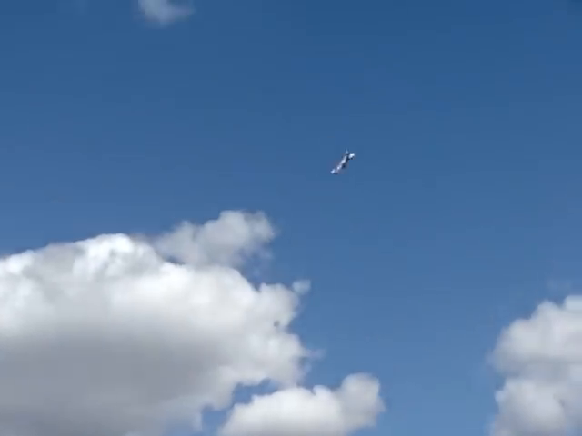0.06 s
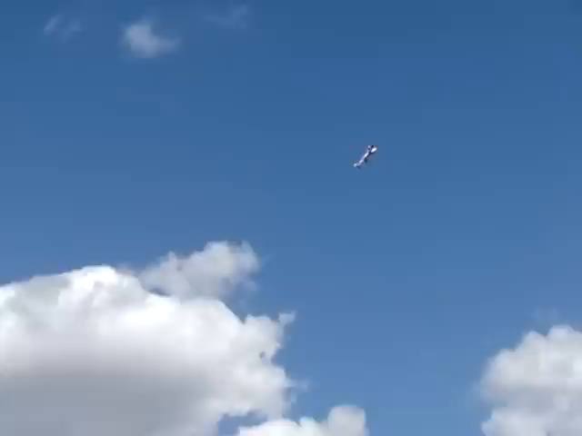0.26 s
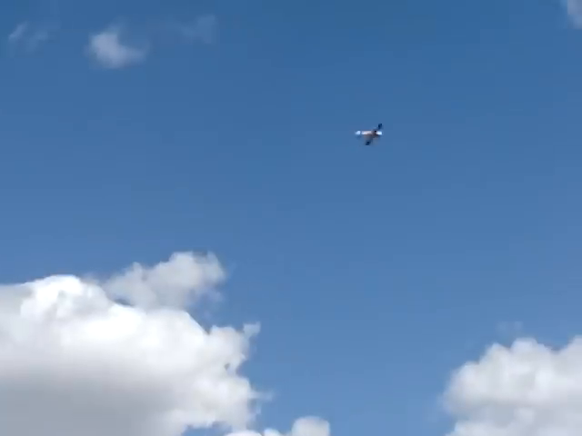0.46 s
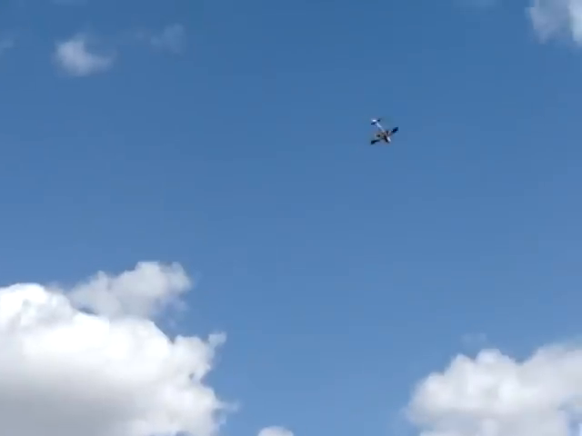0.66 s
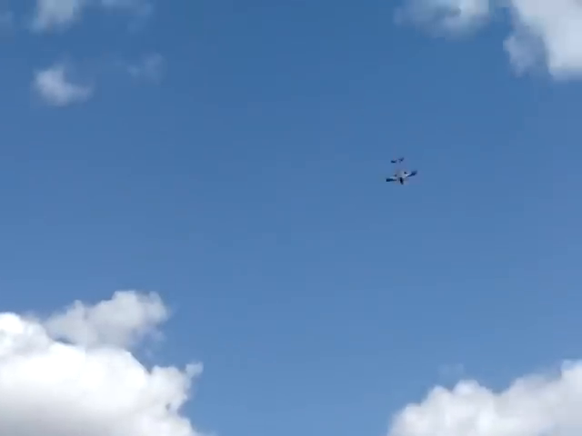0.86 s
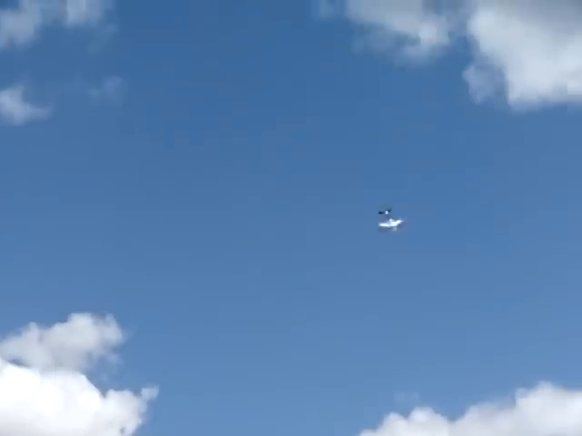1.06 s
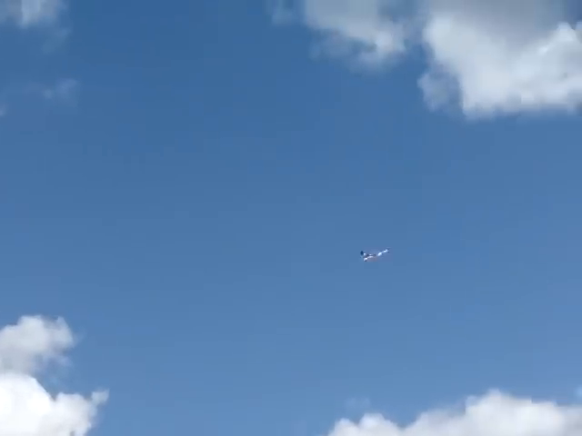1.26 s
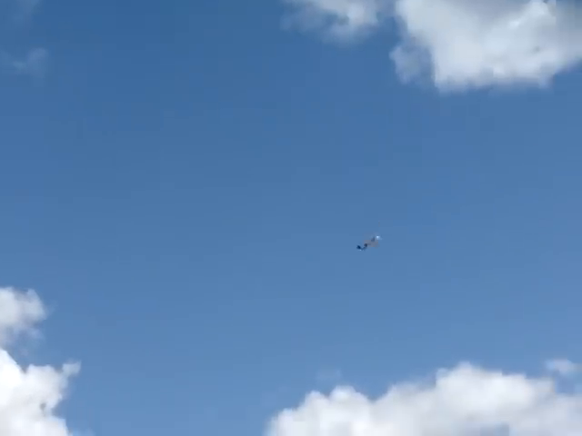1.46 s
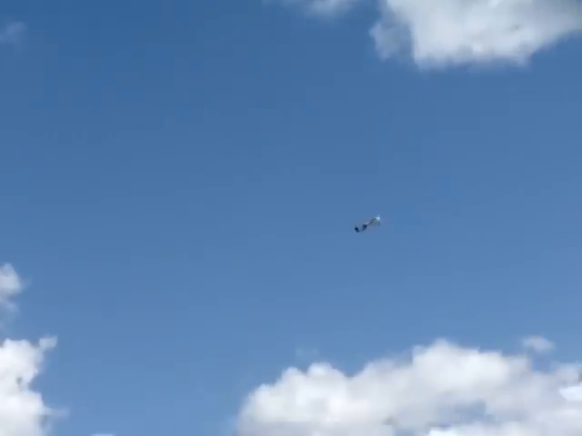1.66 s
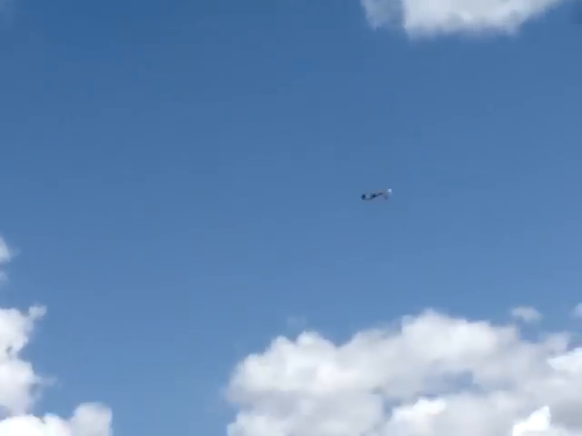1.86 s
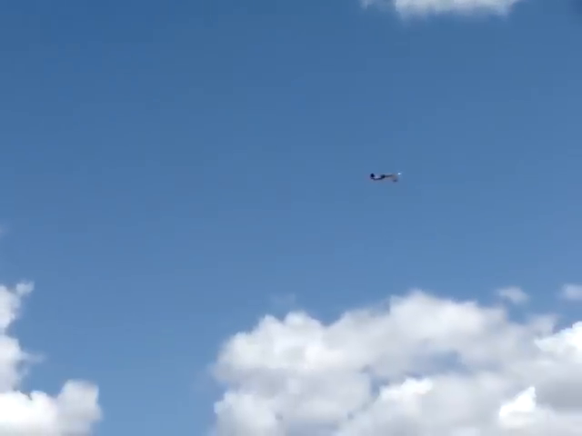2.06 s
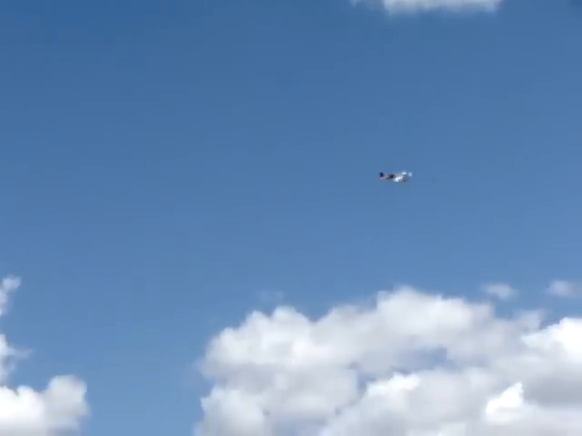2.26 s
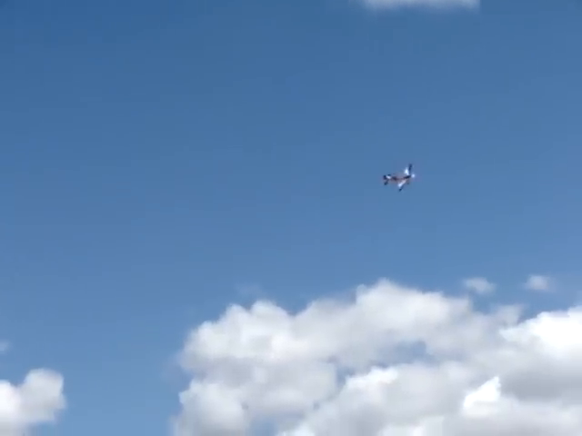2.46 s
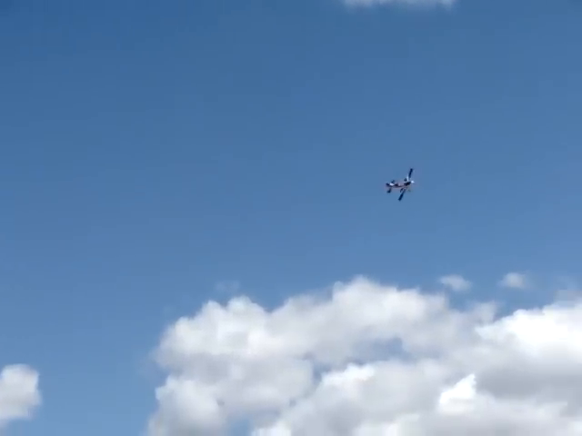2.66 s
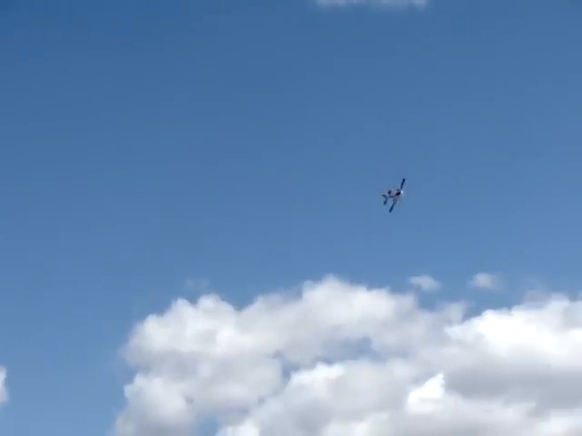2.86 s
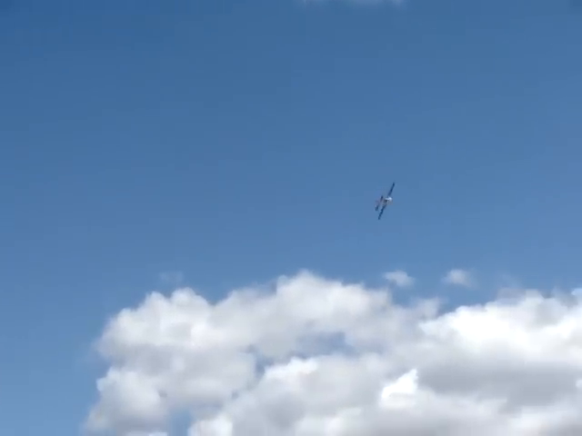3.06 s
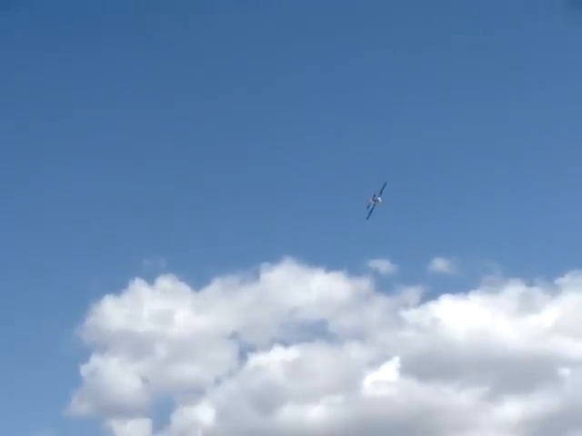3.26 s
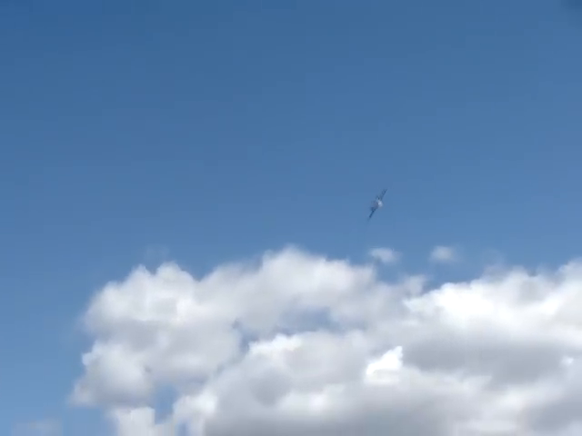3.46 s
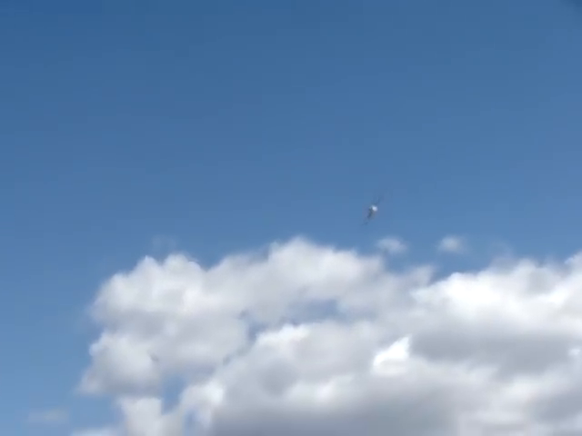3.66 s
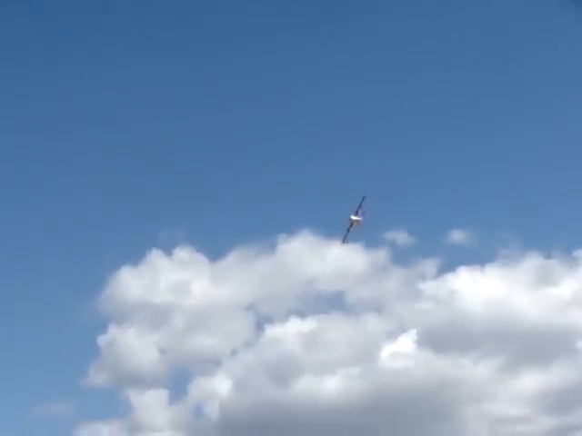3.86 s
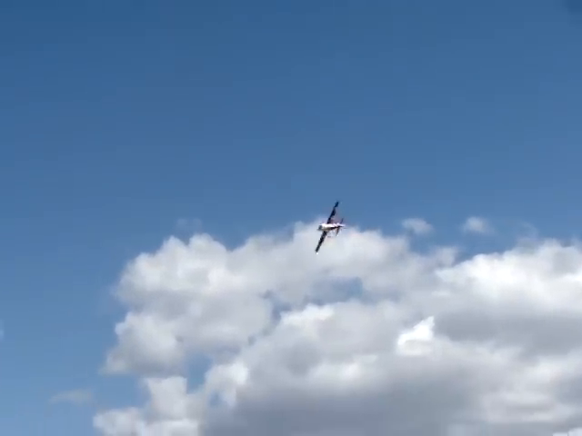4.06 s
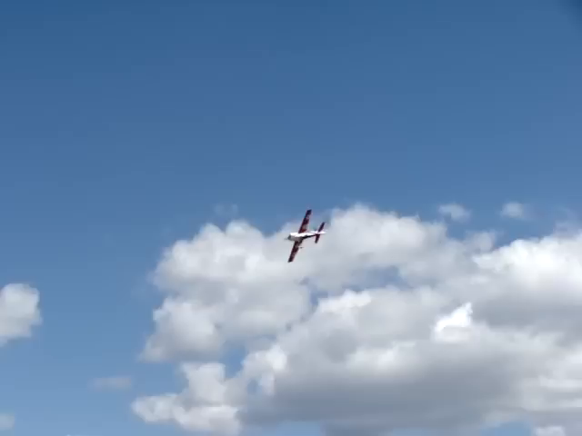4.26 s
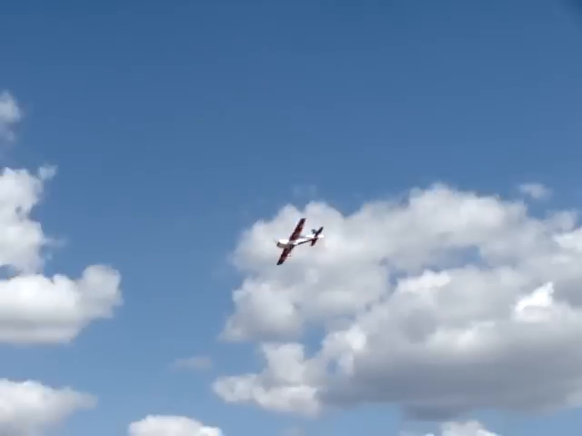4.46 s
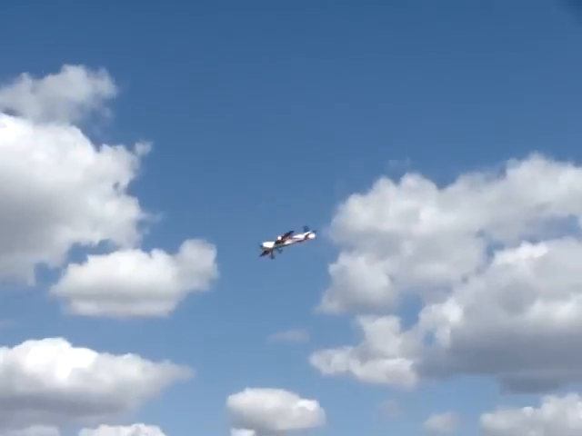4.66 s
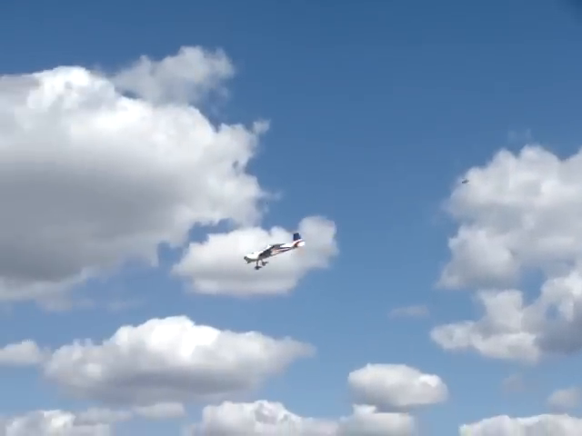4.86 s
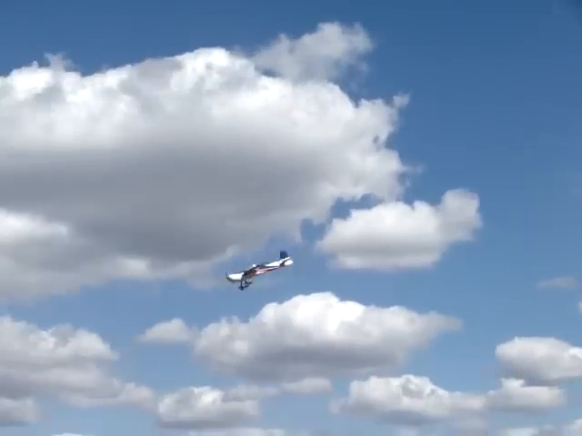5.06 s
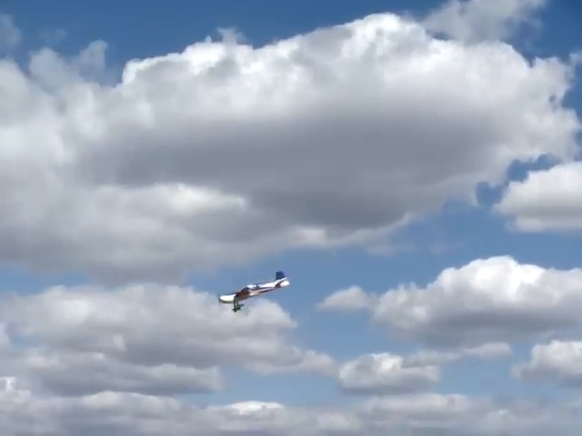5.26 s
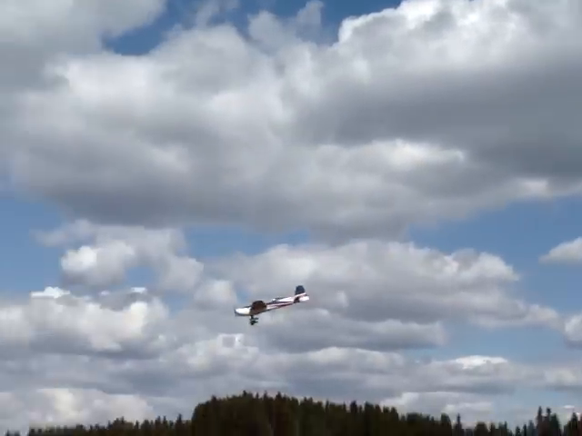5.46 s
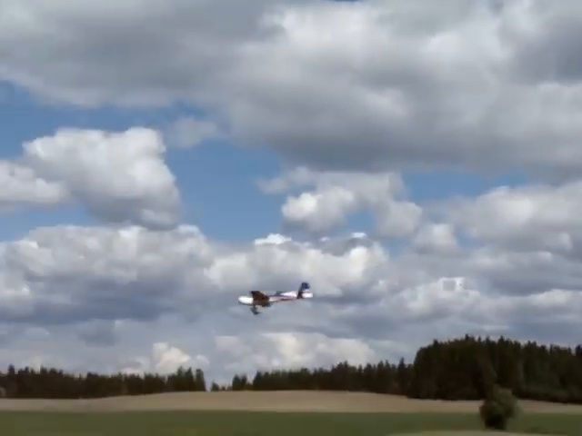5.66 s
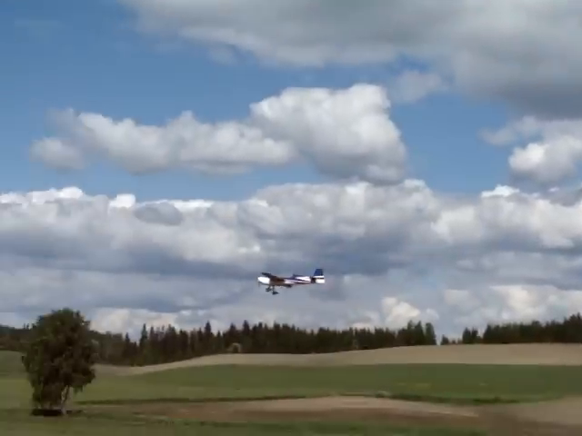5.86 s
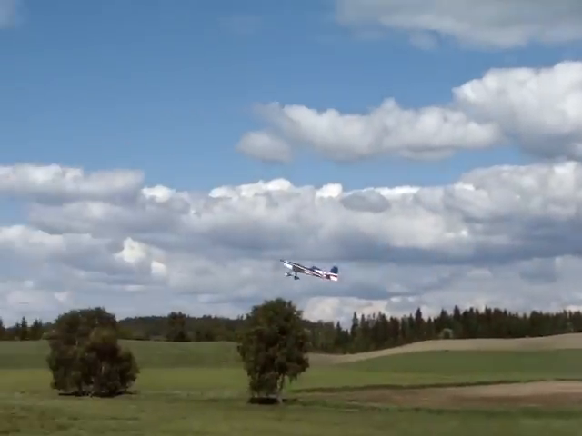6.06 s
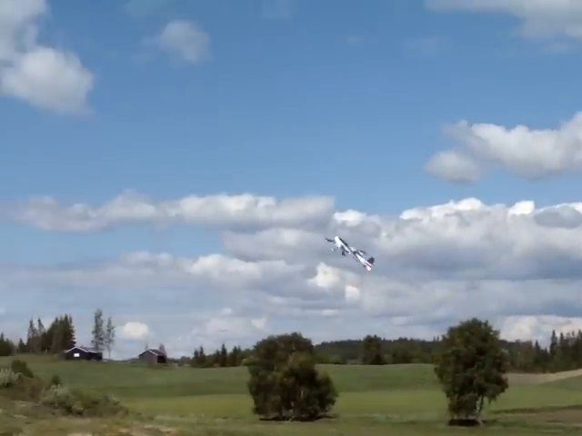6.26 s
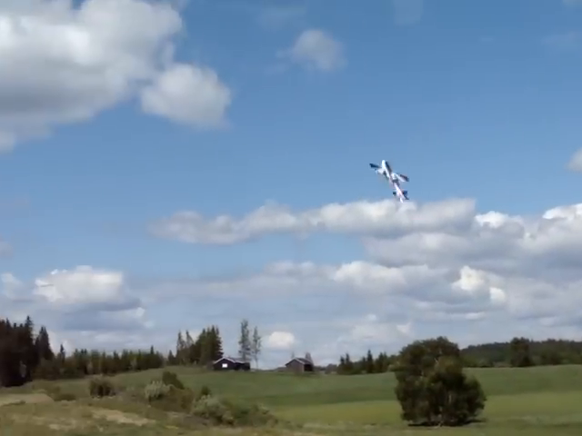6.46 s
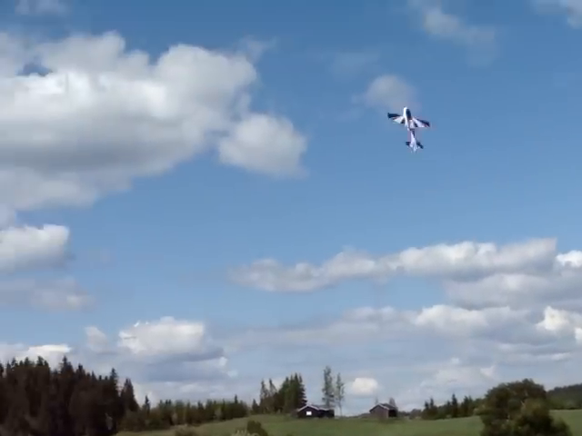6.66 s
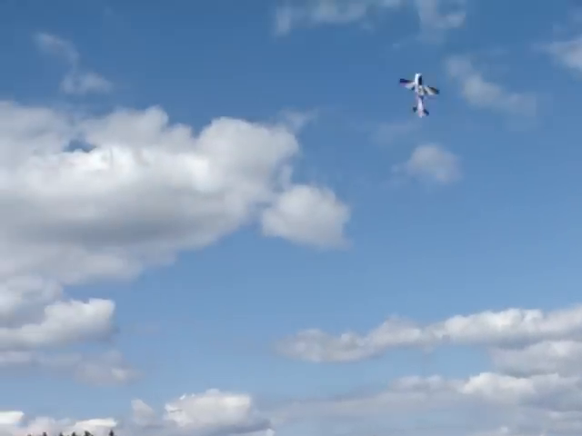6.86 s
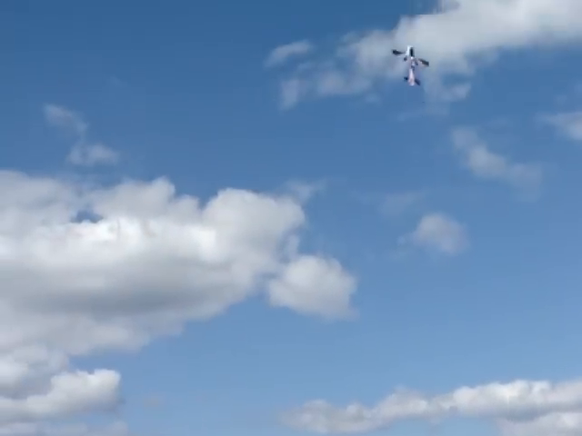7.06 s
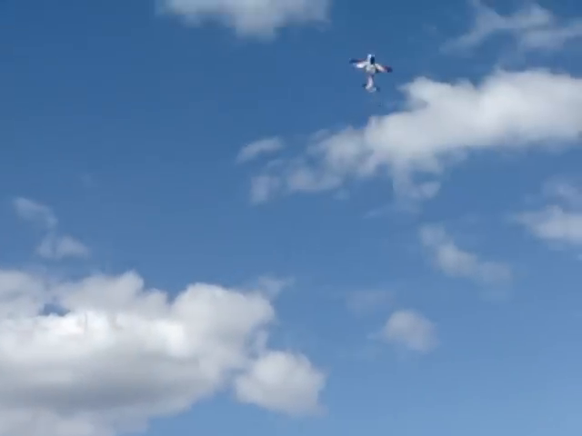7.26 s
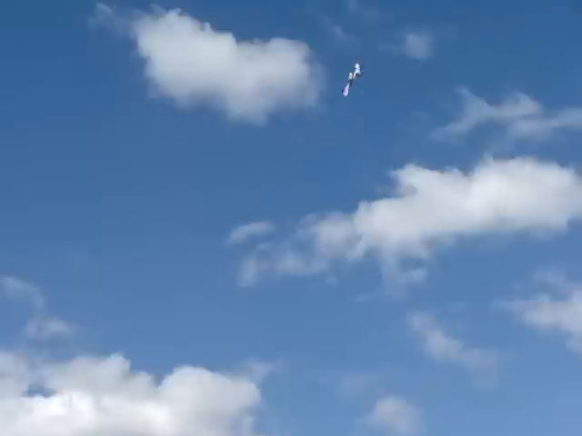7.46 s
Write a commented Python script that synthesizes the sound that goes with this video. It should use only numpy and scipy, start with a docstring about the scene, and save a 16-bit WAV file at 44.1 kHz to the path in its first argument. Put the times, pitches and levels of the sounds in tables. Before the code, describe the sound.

Outdoor two-stroke model plane drones loudly, throttles back under buffeting microphone wind, then howls up to full power for a raspy low pass and climb.

```python
"""A buzzing two-stroke petrol engine climbs at full power, sinks to a sputtering idle, surges and roars by again.
It drives a large model aeroplane over a field: it throttles back, turns towards the listener, makes a low pass
and pulls up. Pulses locked to the crankshaft make the exhaust note, and noise bursts make the rasp and sputter.
A delayed copy from the grass adds a gliding hollow tone. Shaped noise makes the breeze, the gusts that buffet
the microphone, the crackling blasts while the engine idles, and the faint hiss of open air."""
import sys
import numpy as np
from scipy import signal
from scipy.fft import rfft, irfft, next_fast_len
from scipy.io import wavfile
from scipy.ndimage import uniform_filter1d, map_coordinates

SR = 44100
rng = np.random.default_rng(int(sys.argv[2]) if len(sys.argv) > 2 else 0)


def generate_wav(sig):
    """Save sig (samples, or channels by samples) to the path in sys.argv[1] as 16-bit PCM at SR."""
    pcm = np.round(np.clip(np.atleast_2d(sig).T, -1, 1) * 32767).astype(np.int16)
    wavfile.write(sys.argv[1], SR, pcm)


N = 331191  # length of the scene in samples

# How late the echo off the grass arrives, later when the aeroplane is high: (time [s], lag [ms])
ECHO_LAG = [(0, 3.39), (1.05, 3.97), (1.5, 3.64), (3.3, 2.97), (4.8, 2.542), (5.5, 2.21), (5.9, 1.636),
            (6.15, 1.57), (6.5, 1.85), (6.8, 2.47), (7.51, 3.78)]
# Crankshaft speed at full power and at idle (turns a second)
FULL_SPEED, IDLE_SPEED = 103.5, 45


def amp(db):
    """Turn decibels into a gain."""
    return 10 ** (np.asarray(db) / 20)


def unit(x):
    """Scale to an average strength (rms) of 1."""
    return x / np.sqrt(np.mean(x ** 2) + 1e-20)


def curve(*tables, axis=1):
    """Join tables that follow each other in time and read one column as a value per sample."""
    rows = np.vstack(tables)
    return np.interp(np.arange(N) / SR, rows[:, 0], rows[:, axis])


def passing(rows):
    """Gain of a (time [s], level [dB]) table that fades almost to silence outside its span."""
    before = [(rows[0][0] - .1, -90)]
    after = [(rows[-1][0] + .1, -90)]
    return amp(curve(before, rows, after))


def swells(rows, rise_db_per_s, fall_db_per_s):
    """Gain of (start [s], held [s], level [dB]) events that rise, hold and die away; the loudest one counts."""
    t = np.arange(N) / SR
    shapes = []
    for start, held, db in rows:
        rise = rise_db_per_s * np.maximum(start - t, 0)
        fall = fall_db_per_s * np.maximum(t - start - held, 0)
        shapes.append(db - rise - fall)
    return amp(np.max(shapes, axis=0))


def wobble(rate):
    """A smooth random curve through this many random points a second."""
    points = rng.standard_normal(int(N * rate / SR) + 4)
    return map_coordinates(points, [np.arange(N) * rate / SR])


def noise():
    """White noise: an even hiss."""
    return rng.standard_normal(N)


def colour(x, points):
    """Filter x to the given (frequency [Hz], level [dB]) shape, with no sound ahead of its cause."""
    size = 8192
    hz, db = np.transpose(points)
    shape = np.interp(np.log(np.fft.rfftfreq(size, 1 / SR) + 1), np.log(hz + 1), db)
    # folding the cepstrum (spectrum of the log spectrum) puts all the ringing after the start
    cepstrum = irfft(np.log(amp(shape)))
    cepstrum[1:size // 2] *= 2
    cepstrum[size // 2 + 1:] = 0
    ringing = irfft(np.exp(rfft(cepstrum)))[:size // 2]
    return signal.fftconvolve(x, ringing)[:N]


def lowpass(x, hz):
    """Gently take away the treble above hz."""
    return signal.sosfilt(signal.butter(2, hz, fs=SR, output="sos"), x)


def dull(x, hz, back_hz):
    """Take away treble forwards, then backwards, so that the sound is hardly shifted in time."""
    return lowpass(lowpass(x, hz)[::-1], back_hz)[::-1]


def resonate(x, modes):
    """Ring x through resonances: (centre [Hz], width [Hz], level [dB])."""
    return sum(amp(db) * signal.lfilter(*signal.iirpeak(hz, hz / width, SR), x) for hz, width, db in modes)


def disperse(x, hz, radius):
    """Delay frequencies near hz, which spreads each pulse in time without colouring it."""
    poles = [1, -2 * radius * np.cos(2 * np.pi * hz / SR), radius * radius]
    return signal.lfilter(poles[::-1], poles, x)


def steady(x):
    """Even out the level of x so that its midrange stays near rms 1."""
    mid = signal.sosfilt(signal.butter(2, [400, 2200], "band", fs=SR, output="sos"), x)
    power = uniform_filter1d(uniform_filter1d(mid ** 2, SR // 12), SR // 12)
    return x / np.sqrt(np.abs(power) + 1e-12)


def firings(turns, rough, jitter_s, ragged_s, scatter_db, misfire_db):
    """One impulse a turn, as a two-stroke fires; ragged running scatters their times and sizes."""
    at = np.interp(np.arange(1, int(turns[-1])), turns, np.arange(N))
    ragged = rough[at.astype(int)]
    chance = rng.standard_normal((len(at), 2))
    at = at + SR * (jitter_s + ragged_s * ragged ** 2) * chance[:, 0]
    strength = amp((scatter_db + misfire_db * ragged) * chance[:, 1])
    # a short windowed sinc places each impulse between samples
    taps = at.astype(int)[:, None] + np.arange(-7, 9)
    offset = taps - at[:, None]
    shape = np.sinc(offset) * np.cos(np.pi * offset / 16) ** 2
    return np.bincount(taps.clip(0, N - 1).ravel(), (strength[:, None] * shape).ravel(), N)


def puffs(turns, decay_turns, second_blade, between):
    """Noise that bursts at each firing and again as the second blade passes, half a turn on."""
    def burst(phase):
        return np.exp(-(phase % 1) / decay_turns)
    return noise() * (between + burst(turns) + second_blade * burst(turns + .5))


def engine():
    """Exhaust, rasp, throttle surge, propeller rip and low drone all follow the turning crankshaft."""
    # crankshaft speed, before its small random wander: (time [s], speed [turns a second])
    climb_speed = [(0, 103.5), (.67, 103.6), (.86, 95.4), (.94, 94.4), (1.02, 95.5), (1.19, 100.1),
                   (1.33, 102.2), (1.49, 102), (1.58, 96.6)]
    idle_speed = [(1.66, 84.5), (1.8, 69.7), (2.1, 55.1), (2.6, 46.1), (3.2, 43.87), (4.1, 44.47),
                  (4.61, 46.14), (4.76, 69.3)]
    pass_speed = [(4.82, 78.9), (4.94, 93.7), (5.1, 103.4), (5.21, 106.6), (5.48, 107.6), (5.82, 106.9),
                  (6.58, 102.8), (7.22, 102.9), (7.51, 101.8)]
    # exhaust level from where the aeroplane is, as if at full speed: (time [s], level [dB])
    reach = [(0, -19.5), (.66, -23), (1.13, -28.5), (1.42, -24.5), (1.9, -39.5), (2.6, -47.5), (3.6, -26),
             (4.6, -19), (5.4, -18.5), (5.85, -22.5), (6.3, -19.5), (6.62, -22.5), (7.05, -17.5),
             (7.51, -21)]
    # level of the rasp of propeller and exhaust jet, before its flutter: (time [s], level [dB])
    rasp_level = [(0, -40.5), (.35, -31.5), (.8, -48.5), (1.32, -37.5), (1.8, -43.5), (2.05, -70),
                  (2.85, -55), (3.42, -32.5), (3.76, -40), (3.98, -34), (4.36, -34), (4.9, -27.5),
                  (5.3, -30.5), (5.72, -24), (6.27, -29), (6.5, -35), (7.3, -31.5), (7.51, -40.5)]
    exhaust_db_per_octave = 8.5  # a slower engine is quieter

    speed = curve(climb_speed, idle_speed, pass_speed)
    rough = raggedness(speed)
    # a ragged engine cannot hold its speed
    speed = speed * (1 + (.0003 + .014 * rough) * wobble(25))
    turns = np.cumsum(speed) / SR
    view = sides_in_view()
    pulses = firings(turns, rough, jitter_s=.000013, ragged_s=.0003, scatter_db=.6, misfire_db=3)
    exhaust_db = curve(reach) + exhaust_db_per_octave * np.log2(speed / FULL_SPEED)
    main = amp(exhaust_db) * exhaust(turns, pulses, rough, view)
    edge = amp(curve(rasp_level)) * rasp(turns, rough, view)
    return main + edge + surge(turns, pulses) + rip(turns) + drone(speed, turns)


def raggedness(speed):
    """Uneven firing (0-1): least at steady full speed, more when slow or picking up."""
    at_full, at_idle, at_pickup = .03, .77, .25  # the last two are added to the first
    hardest_pickup = 130  # turns a second, gained each second
    gain_rate = uniform_filter1d(np.gradient(speed) * SR, size=SR // 8)
    pickup = np.clip(gain_rate / hardest_pickup, 0, 1)
    slack = np.clip((FULL_SPEED - speed) / (FULL_SPEED - IDLE_SPEED), 0, 1)
    rough = at_full + at_idle * slack ** .8 + at_pickup * pickup
    return np.minimum(rough, at_full + at_idle)


def sides_in_view():
    """Shares of tail, nose, flank, back and belly facing the listener, from the aeroplane's angles."""
    # (time [s], heading [degrees, nose-on 0 to tail-on 180], roll [degrees, belly -90 to back 90])
    attitude = [(0, 160, -86.5), (.72, 160, -64.5), (1, 97, -60.5), (1.6, 85, -84), (3.3, 55.5, -54),
                (4.9, 26.7, 40.5), (5.5, 3.03, 1), (5.9, 63.6, 31), (6.25, 120, 13), (6.62, 125, -60.5),
                (6.92, 91, 77.5), (7.51, 90.4, 74)]
    tail_spill, nose_spill = .051, .055  # shares heard from every side
    aspect = np.radians(curve(attitude))
    roll = np.radians(curve(attitude, axis=2))
    ahead, abeam = np.cos(aspect), np.abs(np.sin(aspect))
    upright, tilted = abeam * np.cos(roll), abeam * np.sin(roll)
    tail, nose, flank, back, belly = np.maximum([-ahead, ahead, upright, tilted, -tilted], 0)
    return tail + tail_spill, nose + nose_spill, flank, back, belly


def exhaust(turns, pulses, rough, view):
    """Firing pulses take the colour of the side in view and give way to noisy sputter at idle."""
    # colour of the firing heard from each side: (frequency [Hz], relative level [dB])
    from_tail = [(40, -55.5), (104, -8.5), (208, 6.5), (312, -5.5), (416, -6), (520, 1.5), (624, -5),
                 (728, -32.5), (832, -9), (936, 2.5), (1040, 2), (1144, 8), (1248, -4.5), (1352, -3),
                 (1664, 0.5), (2080, -14.5), (2496, -6), (3328, -21.5), (4576, -26), (6448, -53),
                 (9152, -103)]
    from_nose = [(40, -34), (104, -11), (208, -7), (312, -10), (416, 7.5), (520, -11.5), (624, -4),
                 (728, 4), (832, -1), (936, -9.5), (1040, -13.5), (1144, -15), (1248, 5.5), (1352, -14.5),
                 (1664, -11.5), (2080, -10), (2496, -10), (3328, -36), (4576, -32), (6448, -37),
                 (9152, -67.5)]
    from_flank = [(40, -41), (104, -14), (208, -4.5), (312, -6), (416, 2.5), (520, -17), (624, 4), (728, 8),
                  (832, -10), (936, -1.5), (1040, -11.5), (1144, 4), (1248, -8.5), (1352, 4.5),
                  (1570, -28.5), (1770, 1.5), (1900, -14.5), (2120, -10), (2496, -20.5), (3328, -26.5),
                  (4576, -15.5), (6448, -37.5), (9152, -38)]
    from_back = [(40, -50.5), (104, -27.5), (208, -3.5), (312, -27.5), (416, -40.5), (520, -10),
                 (624, -43.5), (728, -37), (832, -12.5), (936, -11.5), (1040, -15), (1144, -0.5),
                 (1248, -20.5), (1352, -9), (1750, -14), (2080, -21), (2496, -28), (3328, -28), (4576, -41),
                 (6448, -80), (9152, -74.5)]
    from_belly = [(40, -64.5), (104, -27), (208, 6), (312, -2.5), (416, -10), (520, 10), (624, 10.5),
                  (728, -3.5), (832, 8.5), (936, -3.5), (1040, 4), (1144, 5), (1248, -13), (1352, 6.5),
                  (1664, -18), (2080, 0.5), (3328, -33.5), (4576, -45.5), (9152, -63.5)]
    # colour of the sputter noise: (frequency [Hz], relative level [dB per Hz])
    sputter_colour = [(53, -42), (90, -20.5), (171, 0), (245, -3.5), (325, -0.5), (452, -20.5), (502, -6),
                      (570, 0.5), (729, -1.5), (968, -1.5), (1140, -1), (1390, -6), (1790, -8),
                      (2410, -5.5), (3200, -11), (4160, -82), (7040, -120)]

    sides = (from_tail, from_nose, from_flank, from_back, from_belly)
    note = sum(share * unit(colour(pulses, side)) for share, side in zip(view, sides))
    # the silencer spreads each pulse
    note = disperse(note, hz=540, radius=.94)
    sputter = colour(puffs(turns, decay_turns=.38, second_blade=1.0, between=.93), sputter_colour)
    mix = np.sqrt(1 - rough) * steady(note) + np.sqrt(rough) * steady(sputter)
    return mix * amp(.93 * wobble(14))


def rasp(turns, rough, view):
    """Jet noise in bursts, with sharp cracks at each firing and half a turn on, strongest from front and side."""
    # colour of the rasp: (frequency [Hz], relative level [dB per Hz])
    rasp_colour = [(700, -36), (1300, -13.5), (1900, -7), (2600, -4.5), (3300, -6.5), (4000, -8),
                   (4700, -8.5), (5700, -12), (7000, -14), (8300, -18), (10000, -28.5)]
    # echo lags where the treble loss starts and is full (ms), and its corner (Hz)
    near_lag_ms, far_lag_ms, haze_hz = 1.6, 3.5, 6600

    tail, nose, flank, back, belly = view
    facing = np.clip(nose + flank + .4 * back, 0, 1)
    jet = puffs(turns, decay_turns=.1, second_blade=.65, between=.26 - .1 * facing + rough)
    jet /= np.sqrt(np.abs(uniform_filter1d(jet ** 2, SR // 10)))
    scatter = dict(jitter_s=.000015, ragged_s=.0003, scatter_db=2, misfire_db=3)
    firing = firings(turns, rough, **scatter)
    blade = firings(turns + .5, rough, **scatter)
    cracks = lowpass(disperse(unit(firing + .45 * blade), hz=4400, radius=.9), 5200)
    # ragged running quickly loses the cracks
    share = (.14 + .55 * facing) * (1 - rough) ** 5
    x = unit(colour(np.sqrt(share) * cracks + np.sqrt(1 - share) * jet, rasp_colour))
    # the higher the aeroplane, the more treble the air takes
    far = np.clip((curve(ECHO_LAG) - near_lag_ms) / (far_lag_ms - near_lag_ms), 0, 1)
    hazy = dull(x, haze_hz, haze_hz)
    # turbulent air makes the rasp flutter
    flutter = amp(1.5 * wobble(34) + 1.6 * wobble(11))
    return (x + far * (hazy - x)) * flutter


def surge(turns, pulses):
    """As the throttle opens, pulses and noise ring the intake into a howl, and noise bursts make a roar."""
    # the surge, before the howl and roar levels below: (start [s], held [s], level [dB])
    opening = [(4.86, .13, -20.5)]
    # resonances of the intake: (centre [Hz], width [Hz], relative level [dB])
    intake_modes = [(1135, 45, 5), (2440, 130, -1.5)]
    # colour of the roar: (frequency [Hz], relative level [dB per Hz])
    roar_colour = [(40, -16), (90, 1), (175, 6), (250, -4), (340, -2), (440, -17.5), (570, 9.5), (900, -6),
                   (1700, -6), (3000, -3), (5000, -11), (7000, -21), (10000, -40)]
    howl_db, roar_db = -1, -1.5  # added to the surge level

    intake = unit(resonate(unit(pulses) + .5 * noise(), intake_modes))
    roar = unit(colour(puffs(turns, decay_turns=.27, second_blade=.66, between=.8), roar_colour))
    howling = swells(opening, rise_db_per_s=125, fall_db_per_s=36)
    roaring = swells(opening, rise_db_per_s=65, fall_db_per_s=110)
    return amp(howl_db) * howling * intake + amp(roar_db) * roaring * roar


def rip(turns):
    """In a hard manoeuvre each passing blade tears the air with a short bright burst."""
    # manoeuvres, before a random flicker in level: (start [s], held [s], level [dB])
    manoeuvres = [(0, 0.012, -24.5), (.08, .03, -32), (.85, 0.067, -34), (1.03, 0.017, -30),
                  (1.22, 0.057, -33), (1.39, 0.1, -33.5), (5.91, 0.026, -28), (6.27, 0.036, -32.5),
                  (6.76, 0.018, -29), (6.89, 0.056, -35), (7.24, 0.05, -30)]
    tearing = puffs(turns, decay_turns=.05, second_blade=.8, between=.15)
    band = resonate(tearing, [(2990, 940, 0)])
    band = unit(resonate(band, [(2520, 950, 0)]))
    return swells(manoeuvres, rise_db_per_s=349, fall_db_per_s=129) * amp(1.7 * wobble(23)) * band


def drone(speed, turns):
    """Wavering low tones at multiples of shaft speed, which boom as they cross one low resonance."""
    # level of the drone at part throttle: (time [s], level [dB])
    drone_level = [(1.5, -50), (1.7, -36), (3.3, -45), (4.2, -37.5), (4.6, -32), (4.85, -21), (5.1, -30)]
    # its tones, before boom and wobble: (multiple of shaft speed [-], relative level [dB])
    tones = [(1, -15), (2, -5.5), (3, -15), (4, 0), (5, 1), (6, -5.5), (7, 0), (8, -7)]
    boom_hz, boom_width_hz, boom_db = 175, 25, 9

    total = 0
    for multiple, db in tones:
        boom = boom_db / (1 + ((multiple * speed - boom_hz) / boom_width_hz) ** 2)
        level = amp(db + boom + 1.5 * wobble(16))
        cycles = multiple * turns + rng.random() + .14 * wobble(18)
        total = total + level * np.sin(2 * np.pi * cycles)
    return passing(drone_level) * unit(total)


def shimmer(x, depth_db):
    """Turbulent air lets each frequency band fade and swell on its own."""
    z = signal.stft(x, nperseg=1024)[2]
    field = rng.standard_normal(z.shape)
    for _ in range(2):
        field = uniform_filter1d(uniform_filter1d(field, size=7, axis=0), size=15, axis=1)
    # the bass is stirred less than the treble
    grip = np.clip(np.linspace(0, SR / 2, len(z)) / 1500, .25, 1)
    return signal.istft(z * amp(depth_db * grip[:, None] * unit(field)), nperseg=1024)[1][:N]


def over_grass(x, echo_db, soft_hz):
    """Add the dulled ground echo; its changing lag sweeps a comb of peaks and dips through the sound."""
    dulled = dull(x, soft_hz, soft_hz)
    lag = curve(ECHO_LAG) * SR / 1000  # in samples
    return x + amp(echo_db) * map_coordinates(dulled, [np.arange(N) - lag], order=3)


def wind():
    """Noise makes a low breeze, buffeting gusts, and blasts on the microphone port with crackling eddies."""
    # breeze on the microphone, before its random wobble: (time [s], level [dB])
    breeze_level = [(0, -31.5), (.5, -41.5), (.65, -33), (1.9, -35), (2.4, -44), (3, -37), (4.1, -41),
                    (4.6, -45), (5.15, -63), (6.18, -51), (6.38, -39), (7.05, -42), (7.35, -46.5)]
    # gusts that buffet the microphone, before their wobble: (start [s], held [s], level [dB])
    gust_times = [(.62, 0.028, -28.5), (.84, 0.1, -19.5), (1.07, 0.014, -22), (1.22, .05, -21),
                  (1.33, 0.076, -22), (1.72, 0.088, -22.5), (1.86, 0.15, -19), (2.1, 0.33, -25),
                  (2.45, .15, -26.5), (2.8, 0.047, -22.5), (3.15, 0.051, -33.5), (7.27, 0.036, -27),
                  (7.41, 0.11, -30)]
    # force of blasts that hit the port head-on: (start [s], held [s], relative level [dB])
    blast_times = [(1.87, 0.15, -25.5), (2.02, 0.067, -21.5), (2.12, .14, -20.5), (2.3, 0.046, -24),
                   (2.455, .025, -22), (2.52, .145, -19.5), (2.805, 0.024, -23.5), (2.875, .015, -28.5)]
    # colours of breeze, gusts and blasts: (frequency [Hz], relative level [dB per Hz])
    breeze_colour = [(12, -47), (20, -10.5), (130, -5.5), (170, -12.5), (290, -120)]
    gust_colour = [(24, -44), (40, -10), (90, 0.5), (162, 6.5), (329, -6.5), (407, -4), (450, -9),
                   (580, -41), (990, -120)]
    blast_colour = [(65, -44), (110, -8), (179, 0), (295, 1), (326, 0), (456, -1), (616, -2.5), (1520, -16),
                    (2350, -31.5), (2970, -40.5), (6000, -73), (7800, -103), (13200, -120)]

    breeze = amp(curve(breeze_level) + 2.1 * wobble(16)) * unit(colour(noise(), breeze_colour))
    gusts = swells(gust_times, rise_db_per_s=333, fall_db_per_s=224) * amp(1.1 * wobble(35))
    gusts = gusts * unit(colour(noise(), gust_colour))
    force = swells(blast_times, rise_db_per_s=420, fall_db_per_s=450)
    eddies = unit(colour(noise() * amp(2.8 * wobble(80) + 2.4 * wobble(700)), blast_colour))
    # harder wind breaks into smaller, brighter eddies
    bright = np.clip(force / amp(-19), 0, 1) ** 2.1
    soft = dull(eddies, 670, 880)
    blasts = amp(5) * force * (soft + bright * (eddies - soft))
    return breeze + gusts + blasts + snaps(force)


def snaps(force):
    """Strong eddies burst on the port as short noise puffs; random ones grow with the wind's force."""
    # snaps of the strongest eddies: (time [s], relative level [dB])
    strong_snaps = [(2.0138, -23), (2.1857, -27.5), (2.257, -22.5), (2.3374, -28), (2.47, -23),
                    (2.5287, -28), (2.592, -24.5)]
    # colour of a snap: (frequency [Hz], relative level [dB])
    snap_colour = [(80, -24), (300, 1), (900, 1), (1800, 1), (3000, -11.5), (5000, -24), (10000, -43)]
    random_per_s, under_force_db = 9.1, -11.5

    bursts = (rng.random(N) < random_per_s / SR) * force * amp(under_force_db)
    for s, db in strong_snaps:
        bursts[round(s * SR)] += amp(db)
    # each burst dies away over 1.6 ms
    dying = signal.lfilter([1], [1, -np.exp(-1 / (.0016 * SR))], bursts)
    return amp(10.5) * colour(dying * noise(), snap_colour)


def open_air():
    """The faint hiss of open air is steady shaped noise."""
    # colour of the hiss: (frequency [Hz], relative level [dB per Hz])
    air_colour = [(100, -16.5), (500, -3), (2000, -21), (5000, -33), (10000, -36.5)]
    return amp(-43) * unit(colour(noise(), air_colour))


def scene():
    """The aeroplane over the field, with wind and open air around the listener."""
    plane = shimmer(engine(), depth_db=1.8)
    plane = over_grass(plane, echo_db=-7, soft_hz=3200)
    return (plane + wind() + open_air())[None]


def record(dry):
    """The microphone's electronics cut deep bass, round off high peaks and keep nothing above a top frequency."""
    top_hz = 10100
    thin = signal.sosfilt(signal.butter(2, 32, "high", fs=SR, output="sos"), dry)
    held = thin / (1 + np.abs(thin / .72) ** 6) ** (1 / 6)
    size = next_fast_len(N + SR // 2)
    kept = np.fft.rfftfreq(size, 1 / SR) < top_hz
    return irfft(rfft(held, size) * kept, size)[:, :N]


dry = scene()
out = record(dry)
generate_wav(out)
```